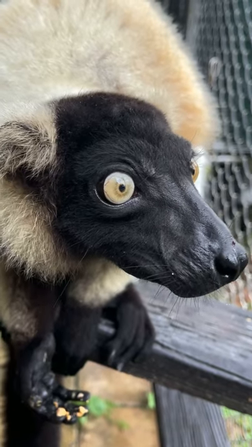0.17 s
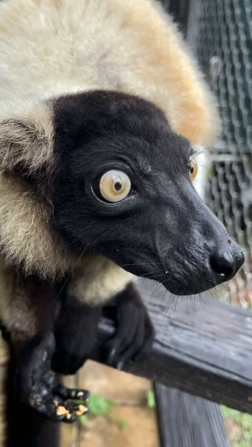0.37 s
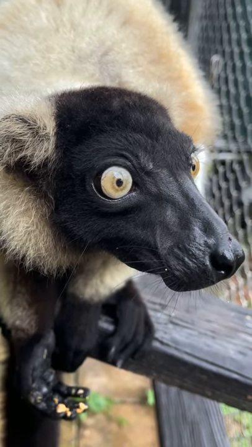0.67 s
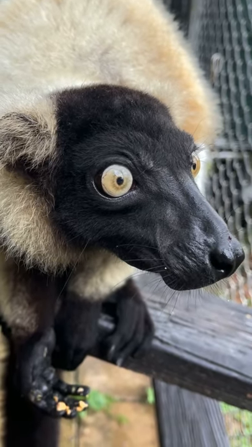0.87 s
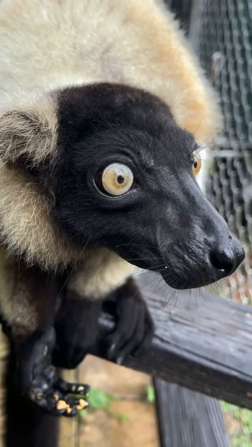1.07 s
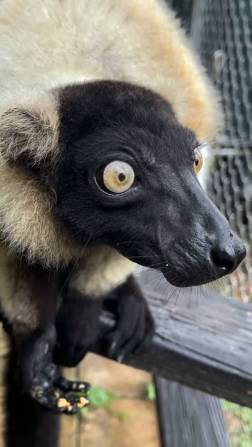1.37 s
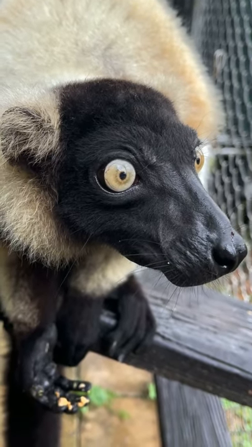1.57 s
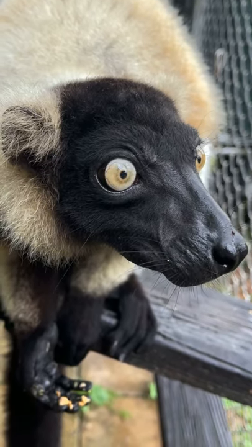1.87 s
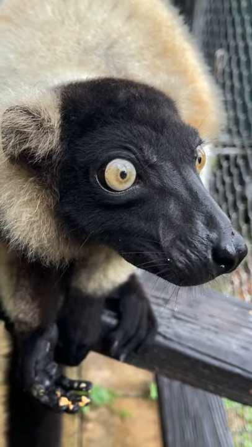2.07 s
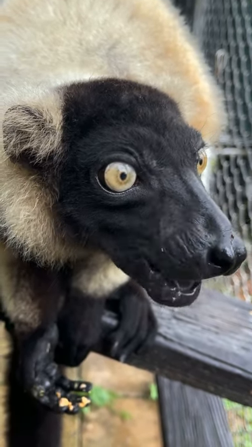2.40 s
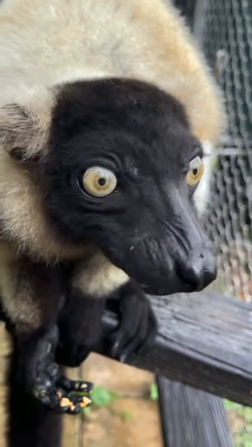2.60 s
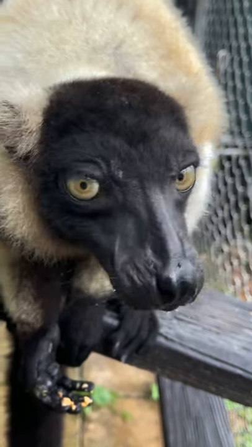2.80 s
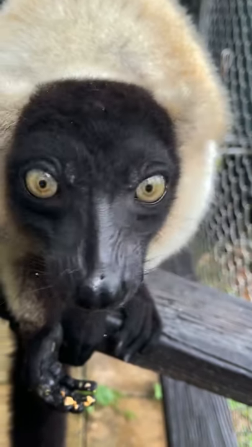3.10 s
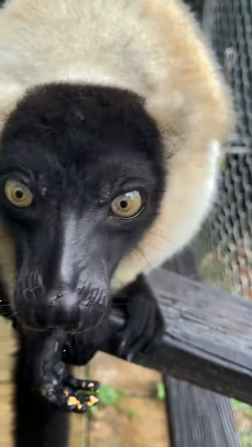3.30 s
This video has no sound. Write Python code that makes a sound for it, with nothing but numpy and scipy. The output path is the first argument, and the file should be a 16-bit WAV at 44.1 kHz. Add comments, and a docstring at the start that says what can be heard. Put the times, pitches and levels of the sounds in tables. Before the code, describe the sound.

Lemur braying close by: creaky grunts leading into long rasping calls, echoing over distant low rumble.

```python
"""Lemur braying in an enclosure

Off to the left, short creaky grunts lead into long raspy squalls, most of which drop in pitch at the end.
A grunt is a pulse train ringing throat resonances; a squall is harmonics and breath through a vocal tract.
Near walls reflect the calls and far ones return a long echo, made of sparse taps with band-wise decay.
Filtered noise gives the low rumble of far traffic and machinery, and the air hiss.
Sine tones give a few decaying ticks and one faint gliding coo."""
import sys
import numpy as np
from scipy import signal
from scipy.fft import rfft, irfft, next_fast_len
from scipy.io import wavfile
from scipy.ndimage import uniform_filter1d

SR = 44100
rng = np.random.default_rng(int(sys.argv[2]) if len(sys.argv) > 2 else 0)


def generate_wav(signal):
    """Clip the signal to [-1, 1] and save it as 16-bit WAV at the path in sys.argv[1]."""
    frames = np.transpose(np.atleast_2d(signal))
    scaled = np.clip(frames, -1, 1) * 32767
    pcm = np.round(scaled).astype(np.int16)
    wavfile.write(sys.argv[1], SR, pcm)


N = 152145
LEAD_IN = SR // 2  # samples computed before time zero

# Spectral density of the rumble: f/Hz, relative level/dB
RUMBLE_SPECTRUM = [(20, -45), (49, -7), (112, 0), (145, -9), (233, -12), (343, -28.5), (416, -23.5),
                   (544, -31), (594, -26.5), (700, -34), (910, -35), (1540, -95)]
RUMBLE_DB, RUMBLE_SWELL_DB, RUMBLE_SWELL_S = -45.5, 1.2, 0.18
RUMBLE_LEFT_DB = 1.5  # left above right, hums included
# Wavering hums: f/Hz, bandwidth/Hz, level/dB
HUMS = [(59.9, 6.4, -47), (116.45, 4.3, -50.5)]
# Spectral density of the air hiss: f/Hz, relative level/dB
AIR_SPECTRUM = [(250, -32), (500, -9), (1500, 3.5), (4000, -22), (7000, -11.5), (12500, -39)]
AIR_DB = -60
# Left-right likeness of the background: f/Hz, coherence/0-1
COHERENCE = [(60, 1), (200, 0.95), (310, 0.94), (460, 0.17), (800, 0.057), (12000, 0.11)]

# Reverberation time: f/Hz, T60/s
REVERB_TIME = [(800, .8), (1500, .5), (2500, .72), (5500, .63), (11000, .62)]
# Colour of the sound sent to the echo: f/Hz, gain/dB
ECHO_COLOUR = [(2500, 6.5), (4000, 6), (6200, 9), (9000, 6.5)]
# Echo on each side, one row for left and one for right: level/dB
ECHO_LEVELS = [
    [-10.5],
    [-8.5],
]
ECHO_START = 1200  # samples before the far walls answer
ECHO_TAP_GAP = 20  # samples: one tap at a random place in each
# Near reflections: delay t/s, left level/dB, right level/dB
NEAR_WALLS = [(.0031, -18, -5.5), (.0074, -19, -8), (0.0115, -16, -11), (0.0166, -17, -6)]

# Grunts: start t/s, length/s, level/dB, pulse rates f/Hz at start, turn and end, place of the turn/0-1
GRUNTS = [(.172, .093, -42.5, 122, 135, 182, .5), (1.2, .072, -36, 186, 198, 222, .5),
          (1.283, .022, -41, 215, 215, 215, .5), (2.125, .088, -33.5, 243, 215, 245, .36),
          (2.222, .018, -40, 215, 215, 215, .5), (3.178, .058, -41.5, 160, 160, 178, .5)]
# Throat resonances of the grunt: f/Hz, bandwidth/Hz, level/dB
GRUNT_THROAT = [(1360, 170, 0), (1970, 140, 0), (3700, 1000, -20)]
GRUNT_BREATH, GRUNT_FADE_S = .003, .004  # noise rms beside unit pulses; fade-out

# Squalls: t/s, voice level/dB, breath hiss relative to voice before HISS_DB/dB, mouth resonance f/Hz
SQUALL_BEFORE = [(-.5, -18, -5, 1820), (-.03, -35, -61, 1810)]  # over before time zero; only its echo remains
SQUALL_1 = [(0.275, -47, -34, 1400), (0.292, -42, -32, 1500), (0.298, -37, -34, 1795),
            (0.343, -32, -36, 1850), (0.401, -36, -40, 1640), (0.593, -33.5, -39.5, 1870),
            (0.931, -32, -29.5, 2024), (1.051, -30, -40, 1880), (1.078, -41, -30, 1920)]
SQUALL_2 = [(1.305, -34, -28, 1530), (1.353, -31, -37.5, 1560), (1.523, -33, -35.5, 1750),
            (1.698, -31, -40, 1780), (1.793, -30.5, -31, 2020), (1.93, -29, -34, 1870),
            (2.031, -31.5, -31.5, 2200), (2.049, -51, -27, 1875)]
SQUALL_3 = [(2.235, -34, -10, 1550), (2.27, -30.5, -34.5, 1526), (2.481, -30, -39.5, 1810),
            (2.65, -30, -33, 1910), (2.78, -31.5, -29, 2014), (2.86, -29, -30.5, 2100),
            (2.93, -32, -54, 1830), (2.968, -32, -26, 1770)]
SQUALL_4 = [(3.27, -36, -20, 1410), (3.284, -35.5, -33, 1450), (3.299, -31.5, -35, 1670),
            (3.45, -30.5, -41, 1860)]
# Mean fundamental of the squalls: t/s, f/Hz
PITCH = [(-.1, 442), (-.03, 353), (.275, 339.2), (.31, 419.6), (.45, 436.2), (.65, 439.5), (.85, 443.5),
         (.95, 432), (1.03, 412.2), (1.05, 388.4), (1.078, 310), (1.305, 393.7), (1.385, 446.2),
         (1.46, 433.1), (1.65, 444.3), (1.82, 453.8), (1.93, 446.7), (2.015, 432.8), (2.05, 346.4),
         (2.235, 374), (2.27, 428.4), (2.47, 442.7), (2.65, 444.9), (2.77, 436), (2.905, 416), (2.94, 378),
         (2.968, 330.2), (3.27, 336.7), (3.3, 420), (3.325, 441.4), (3.45, 436.6)]
# Share of breath against harmonics, which also sets the unsteadiness: t/s, roughness/0-1
ROUGHNESS = [(0, .5), (.3, .68), (.7, .7), (.85, .45), (1.0, .35), (1.08, .22), (1.3, .45), (1.45, .62),
             (1.75, .62), (1.95, .5), (2.05, .36), (2.23, .48), (2.45, .6), (2.7, .52), (2.82, .2),
             (2.97, .2), (3.27, .35), (3.45, .55)]
# Response of the throat: f/Hz, gain/dB
THROAT = [(300, -32.5), (600, -40), (800, -16.5), (880, -14), (1000, -9), (1170, -12), (1320, -5.5),
          (1500, -5), (1750, -5.5), (1950, -3.5), (2130, -10), (2350, -10), (2570, -5.5), (2750, -9),
          (3000, -16), (3400, -10.5), (3550, -12), (3690, -7), (3950, -16), (4250, -11.5), (4420, -9),
          (4620, -15), (5700, -24), (6300, -18.5), (7200, -24), (9000, -62)]
# Spectrum of the breath hiss: f/Hz, relative level/dB
HISS_SPECTRUM = [(4800, -11), (5700, 0), (6250, 1.5), (6800, -31), (7600, -1.5), (9000, -5.5),
                 (11000, -1.5), (12500, -17.5)]
# Swell of the upper rasp: t/s, gain/dB
RASP_SWELL = [(0, 6), (.7, -7), (2.4, 3), (2.9, 6.5), (3.3, 2)]
RASP_HZ, RASP_WIDTH_HZ = 5940, 2100
MOUTH_WIDTH_HZ, MOUTH_DB = 333, 4.5
HISS_DB, HISS_RISE_S = 12, 0.072
RISE_S, FALL_S = 0.0022, 0.0085
WOBBLE, WOBBLE_S = .026, .007  # rms pitch deviation as a fraction at full roughness; smoothing span
FLUTTER_DB, THROB_DB, FLUTTER_S = 8, 1.5, .006  # rms per harmonic and of the whole voice at full roughness
UPPER_DB_PER_HARMONIC = -1.6  # harmonics above the sixth sink into the breath
UPPER_SMEAR = .38  # rms radians of phase wander per harmonic above the fifth

# Excess of left over right in the calls: f/Hz, level difference/dB
LEFT_EXCESS = [(450, 18), (700, 11.5), (1250, 10), (2400, 4), (3600, 2.5), (6000, 0.5), (12000, 1)]
LEFT_LAG_S, RIGHT_DIRECT_DB = 4.5e-5, -7  # direct level before the left excess is taken off

# Faint coo: t/s, f/Hz, left level/dB
COO = [(2.07, 590, -72), (2.12, 650, -57), (2.155, 645, -70), (2.19, 608, -58), (2.3, 585, -58),
       (2.42, 535, -61), (2.52, 495, -72)]
# Ticks: t/s, initial left level/dB, f/Hz
TICKS = [(3.062, -35, 9200), (3.074, -42, 11300), (3.108, -35, 9400), (3.295, -34, 9100),
         (2.255, -50, 10900)]

# Tone colour of the left-right sum: f/Hz, gain/dB
SUM_COLOUR = [(7600, 0.5), (8500, -9), (8900, -27), (9600, -39), (10000, -8), (10600, 3.5), (11800, 0.5),
              (12400, -46)]
# Tone colour of the left-right difference: f/Hz, gain/dB
DIFFERENCE_COLOUR = [(7600, 0), (8500, 3), (10000, 2), (10900, 0), (11200, -10), (11500, -50)]
BAND_LIMIT_HZ = 12500


def gain_of(db):
    """Amplitude ratio: a level of 20 dB is a factor of ten."""
    return 10 ** (np.asarray(db) / 20)


def evened(x):
    """Normalisation of a signal to unit rms."""
    return x / np.sqrt(np.mean(x ** 2) + 1e-20)


def read(points, hz):
    """Interpolation of a spectrum along a logarithmic frequency axis."""
    f, value = np.transpose(points)
    return np.interp(np.log(hz + 1), np.log(f + 1), value)


def add(mix, start_s, sound):
    """Superposition: a sound adds to the mix from its start time."""
    part = mix[round(start_s * SR) + LEAD_IN:][:len(sound)]
    part += sound[:len(part)]


def coloured(x, points_db, early_s=0):
    """Linear filtering by a gain curve; a linear phase advances the signal in time."""
    size = next_fast_len(x.shape[-1] + 4096)
    hz = np.fft.rfftfreq(size, 1 / SR)
    advance = np.exp(2j * np.pi * hz * early_s)
    spectrum = rfft(x, size) * gain_of(read(points_db, hz)) * advance
    return irfft(spectrum, size)[..., :x.shape[-1]]


def resonate(x, hz, width_hz):
    """Moving resonance: shift its centre to zero frequency, low-pass to unit peak gain, shift back."""
    turn = np.exp(2j * np.pi * np.cumsum(hz * np.ones(len(x))) / SR)
    r = np.exp(-np.pi * width_hz / SR)
    smoothed = signal.lfilter([1 - r], [1, -r], x / turn + 1e-18)
    return 2 * (turn * smoothed).real


def drift(size, span_s):
    """Slow random fluctuation of unit rms: white noise averaged twice over a span."""
    n = max(round(span_s * SR), 1)
    once = uniform_filter1d(rng.standard_normal(size), n)
    return evened(uniform_filter1d(once, n))


def edges(t, rise_s, fall_s):
    """Linear onset and decay of an envelope."""
    return np.clip(np.minimum(t / rise_s, (t[-1] - t) / fall_s), 0, 1)


def noise_pair(points_db):
    """Partial coherence: a shared and an independent noise mix by frequency on the right."""
    hz = np.fft.rfftfreq(N, 1 / SR)
    left, other = rfft(rng.standard_normal((2, N))) * gain_of(read(points_db, hz))
    likeness = np.clip(read(COHERENCE, hz), 0, 1)
    right = likeness * left + np.sqrt(1 - likeness ** 2) * other
    return evened(irfft(np.array([left, right]), N))


def background():
    """Stationary noise: a swelling low rumble, narrow noise bands heard as wavering hums, and air hiss."""
    hum = sum(gain_of(db) * evened(resonate(rng.standard_normal(N), hz, width_hz))
              for hz, width_hz, db in HUMS)
    rumble_db = RUMBLE_DB + RUMBLE_SWELL_DB * drift(N, RUMBLE_SWELL_S)
    low = gain_of(rumble_db) * noise_pair(RUMBLE_SPECTRUM) + hum
    balance = gain_of([[RUMBLE_LEFT_DB / 2], [-RUMBLE_LEFT_DB / 2]])
    return low * balance + gain_of(AIR_DB) * noise_pair(AIR_SPECTRUM)


def echo(x):
    """Reverberation: sparse taps of random sign, different on each side, decay at a rate set by band."""
    taps = np.zeros((2, SR))
    places = np.arange(ECHO_START, SR - ECHO_TAP_GAP, ECHO_TAP_GAP)
    places = places + rng.integers(0, ECHO_TAP_GAP, (2, len(places)))
    np.put_along_axis(taps, places, rng.choice([-1., 1.], places.shape), 1)
    hz, t, bands = signal.stft(taps, SR, nperseg=256)
    decay = gain_of(-60 * t / read(REVERB_TIME, hz)[:, None])
    tail = signal.istft(bands * decay, SR, nperseg=256)[1]
    tail /= np.linalg.norm(tail[0])
    return signal.fftconvolve(x[None], tail, axes=1)[:, :len(x)]


def grunt(start, length, db, first, middle, last, turn):
    """Impulse excitation: slow pulses ring two strong throat resonances and a weak broad one above."""
    t = np.arange(0, length, 1 / SR)
    leg = np.interp(t, [0, length * turn, length], [-1, 0, 1])
    outer_rate = np.where(leg < 0, first, last)
    rate = middle + (outer_rate - middle) * np.sin(np.pi / 2 * leg) ** 2
    cycles = np.cumsum(rate) / SR
    pulses = np.diff(np.floor(cycles), prepend=-1)  # one at each whole cycle
    drive = pulses + GRUNT_BREATH * rng.standard_normal(len(t))
    ring = sum(gain_of(level) * resonate(resonate(drive, hz, width_hz), hz, 2 * width_hz)
               for hz, width_hz, level in GRUNT_THROAT)
    # the shifted time leaves the onset abrupt
    fade = edges(t + GRUNT_FADE_S, GRUNT_FADE_S, GRUNT_FADE_S)
    return start, gain_of(db) * evened(ring) * fade


def vocal_folds(cycles, rough):
    """Fourier synthesis: 17 harmonics follow one pitch, each with a random starting phase and own flutter."""
    total = np.zeros(len(cycles))
    for k in range(1, 18):
        smear = UPPER_SMEAR * max(k - 5, 0) * drift(len(cycles), FLUTTER_S)
        flutter_db = FLUTTER_DB * rough * drift(len(cycles), FLUTTER_S)
        level_db = flutter_db + UPPER_DB_PER_HARMONIC * max(k - 6, 0)
        total += np.cos(2 * np.pi * (k * cycles + rng.random()) + smear) * gain_of(level_db)
    return total


def squall(rows):
    """Source-filter principle: harmonics and breath puffs pass throat and moving mouth, under added hiss."""
    rows = np.transpose(rows)
    t = np.arange(rows[0, 0], rows[0, -1], 1 / SR)
    effort_db, hiss_db, mouth_hz = (np.interp(t, rows[0], column) for column in rows[1:])
    pitch_hz = np.interp(t, *np.transpose(PITCH))
    rough = np.interp(t, *np.transpose(ROUGHNESS))
    cycles = np.cumsum(pitch_hz * (1 + WOBBLE * rough * drift(len(t), WOBBLE_S))) / SR

    folds = vocal_folds(cycles, rough)
    # breath noise bursts at the start of each cycle
    puffs = (1 + np.exp(-(cycles % 1) / 0.17)) * rng.standard_normal((2, len(t)))
    drive = (1 - rough) * evened(folds) + rough * evened(puffs[0])

    mouth = gain_of(MOUTH_DB) * resonate(drive, mouth_hz, MOUTH_WIDTH_HZ)
    voice = coloured(drive + mouth, THROAT)
    rasp_gain = gain_of(np.interp(t, *np.transpose(RASP_SWELL)))
    voice = voice + (rasp_gain - 1) * resonate(voice, RASP_HZ, RASP_WIDTH_HZ)
    voice /= np.sqrt(uniform_filter1d(voice ** 2, SR // 20))  # unit running power
    voice *= gain_of(THROB_DB * rough * drift(len(t), FLUTTER_S))

    hiss = gain_of(HISS_DB + hiss_db) * evened(coloured(puffs[1], HISS_SPECTRUM))
    hiss *= edges(t - t[0], HISS_RISE_S, FALL_S)
    return t[0], edges(t - t[0], RISE_S, FALL_S) * gain_of(effort_db) * (voice + hiss)


def lemur():
    """Direct and reflected paths: the calls are weaker, slightly earlier and wetter on the right."""
    calls = np.zeros(N + LEAD_IN)
    for row in GRUNTS:
        add(calls, *grunt(*row))
    for rows in (SQUALL_BEFORE, SQUALL_1, SQUALL_2, SQUALL_3, SQUALL_4):
        add(calls, *squall(rows))
    direct = gain_of([[0], [RIGHT_DIRECT_DB]]) * calls
    near = sum(gain_of([[left_db], [right_db]]) * np.roll(calls, round(delay_s * SR))
               for delay_s, left_db, right_db in NEAR_WALLS)
    far = gain_of(ECHO_LEVELS) * echo(coloured(calls, ECHO_COLOUR))
    left, right = (direct + near + far)[:, LEAD_IN:]
    right_cut = [(hz, -db) for hz, db in LEFT_EXCESS]
    return np.array([left, coloured(right, right_cut, LEFT_LAG_S)])


def coo(mix):
    """Frequency modulation: a faint sine whose phase is the running sum of a gliding frequency."""
    s, hz, db = np.transpose(COO)
    t = np.arange(s[0], s[-1], 1 / SR)
    phase = 2 * np.pi * np.cumsum(np.interp(t, s, hz)) / SR
    add(mix, s[0], gain_of(np.interp(t, s, db)) * np.sin(phase))


def ticks(mix):
    """Exponential decay: high sine bursts fall 60 dB in 2.4 ms."""
    t = np.arange(200) / SR
    for s, db, hz in TICKS:
        add(mix, s, gain_of(db - 60 * t / 0.0024) * np.sin(2 * np.pi * hz * t))


def small_sounds():
    """Amplitude panning: coo and ticks are without echo and weaker on the right."""
    mix = np.zeros(N + LEAD_IN)
    coo(mix)
    ticks(mix)
    return mix[LEAD_IN:] * np.array([[1], [.4]])


def scene():
    """Superposition of all sources on two channels."""
    return background() + lemur() + small_sounds()


def record(dry):
    """Filtering: the sum has a notch near 9.6 kHz, the difference loses its top; then a band limit."""
    both = coloured(dry[0] + dry[1], SUM_COLOUR) / 2
    apart = coloured(dry[0] - dry[1], DIFFERENCE_COLOUR) / 2
    pair = np.array([both + apart, both - apart])
    low_pass = signal.firwin(511, BAND_LIMIT_HZ, window=("kaiser", 9), fs=SR)
    return signal.oaconvolve(pair, low_pass[None], "same")


dry = scene()
out = record(dry)
generate_wav(out)
```